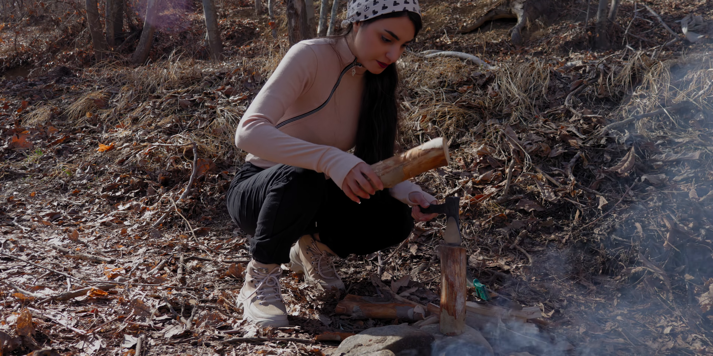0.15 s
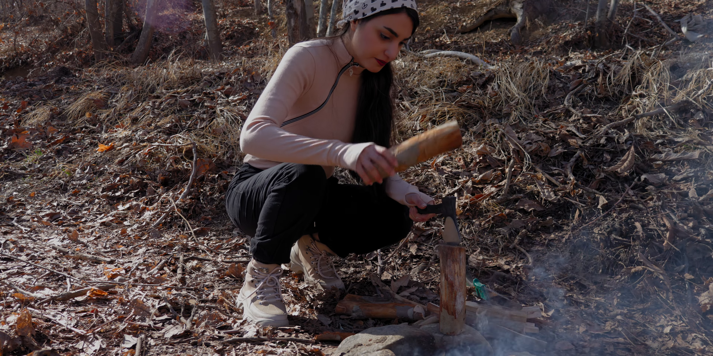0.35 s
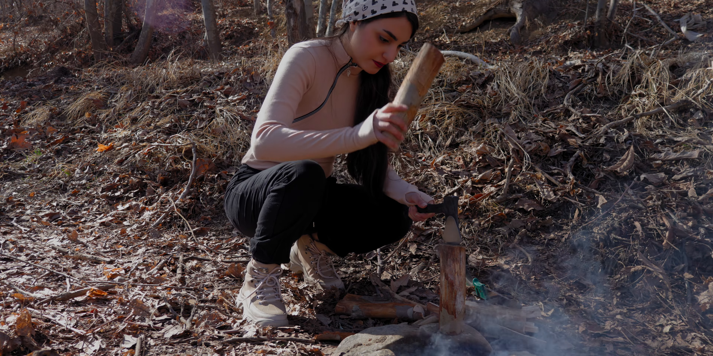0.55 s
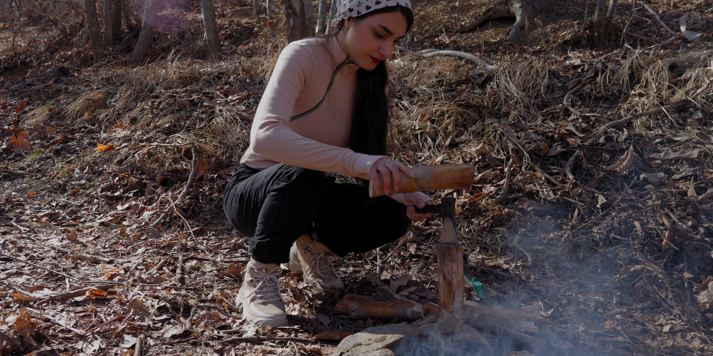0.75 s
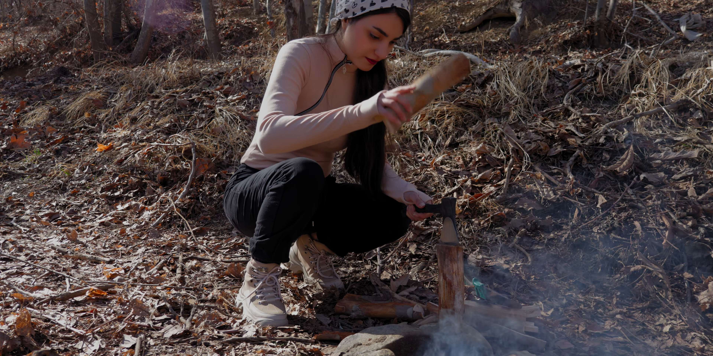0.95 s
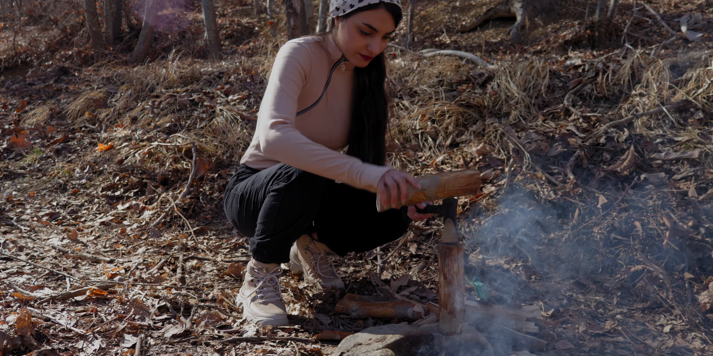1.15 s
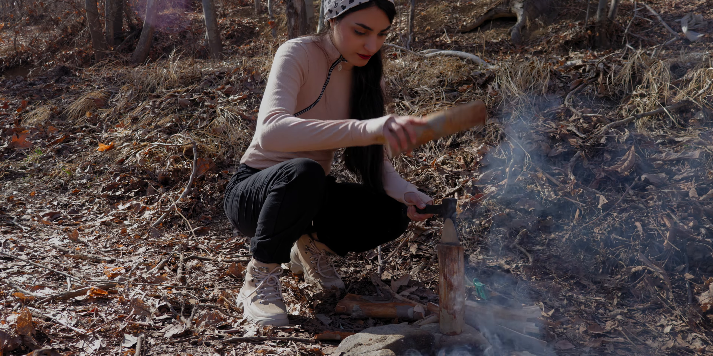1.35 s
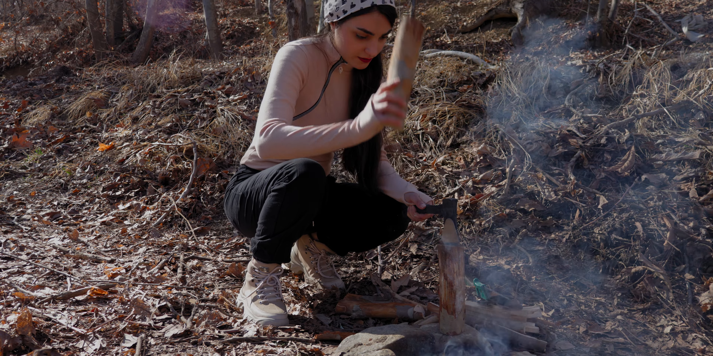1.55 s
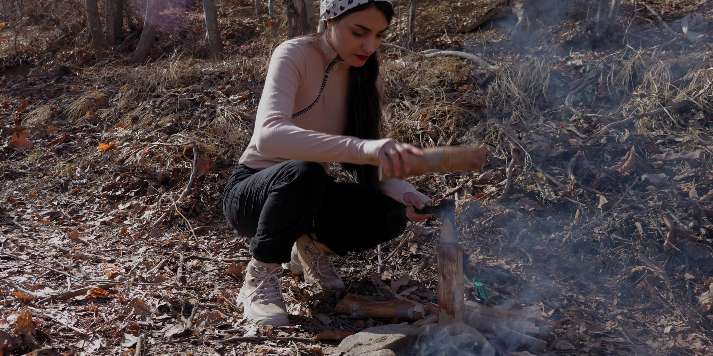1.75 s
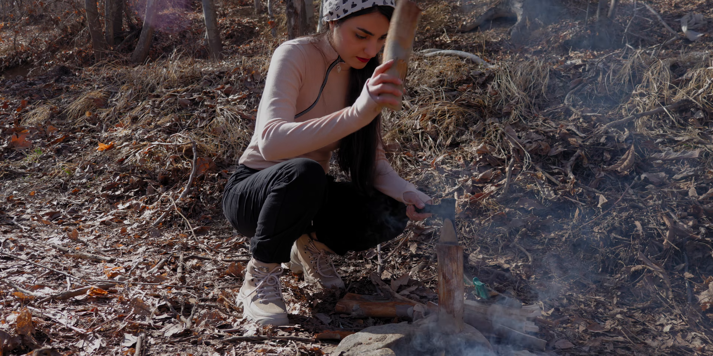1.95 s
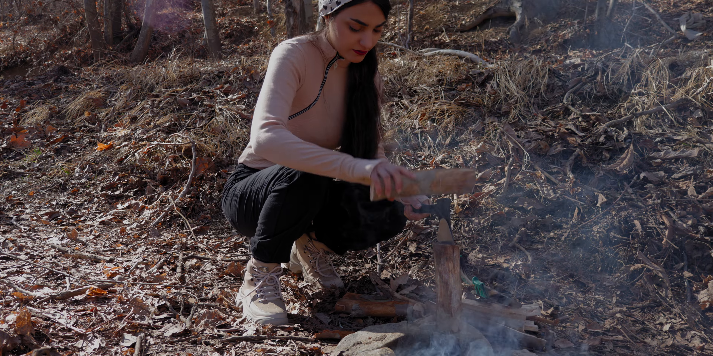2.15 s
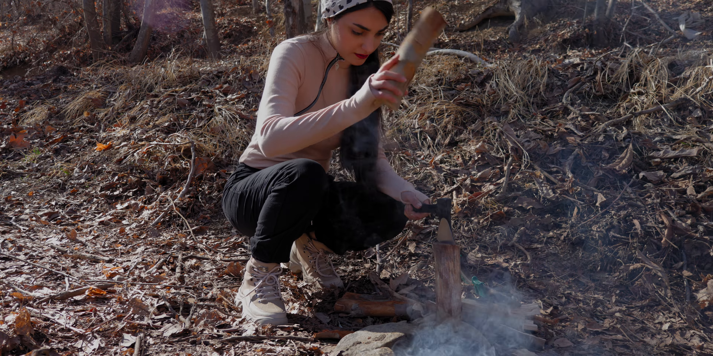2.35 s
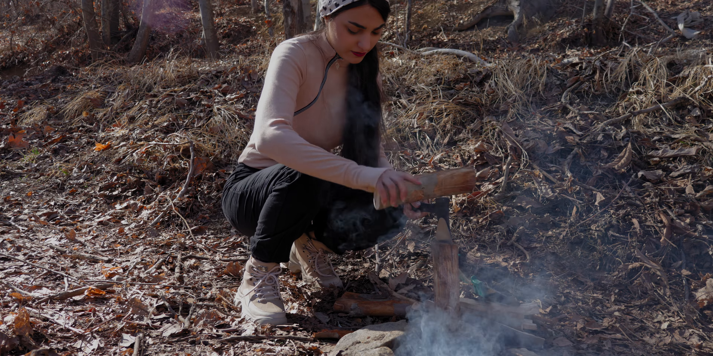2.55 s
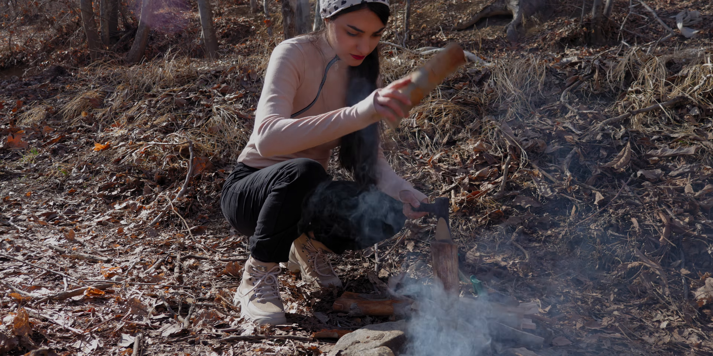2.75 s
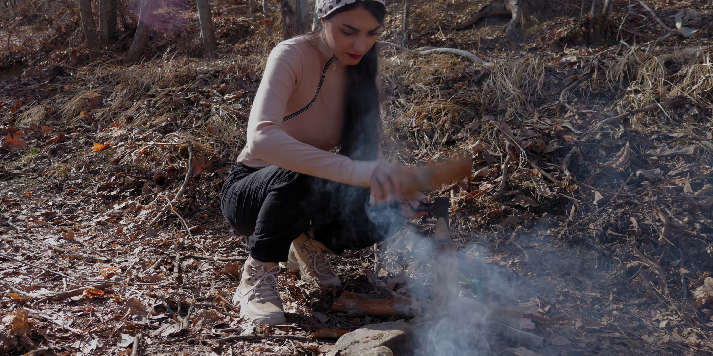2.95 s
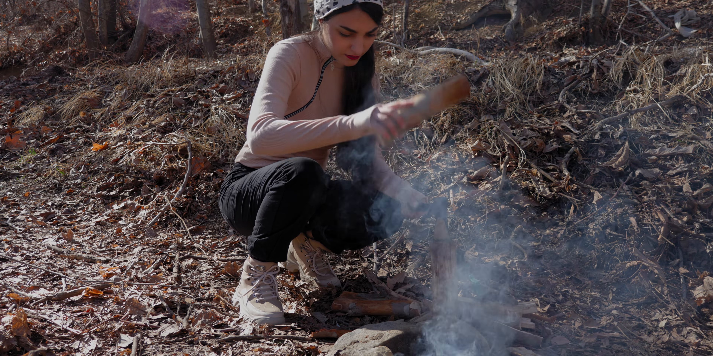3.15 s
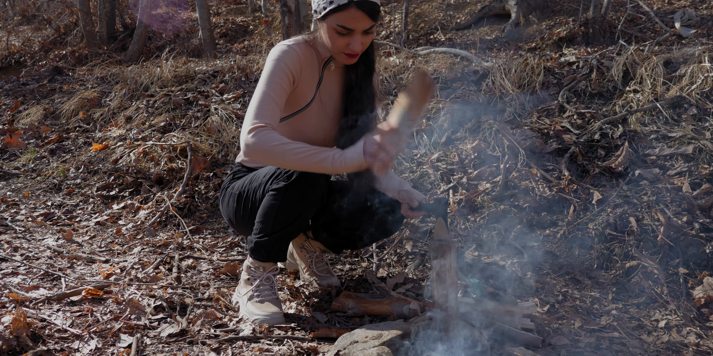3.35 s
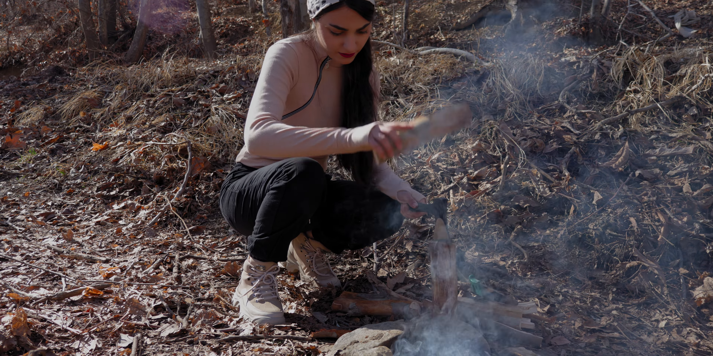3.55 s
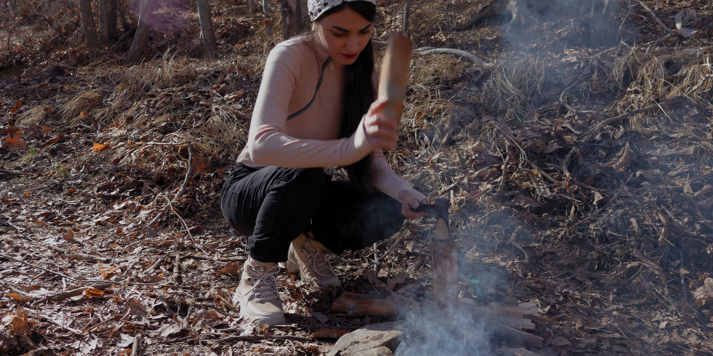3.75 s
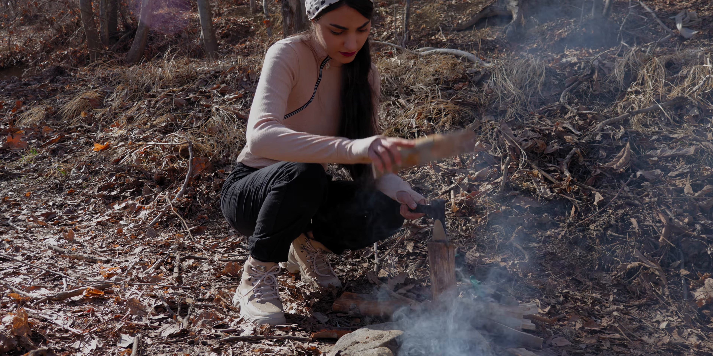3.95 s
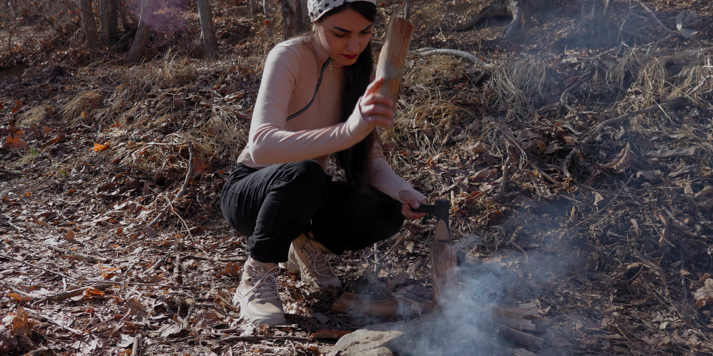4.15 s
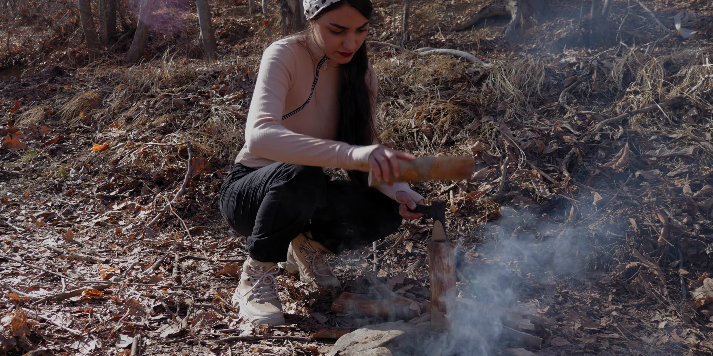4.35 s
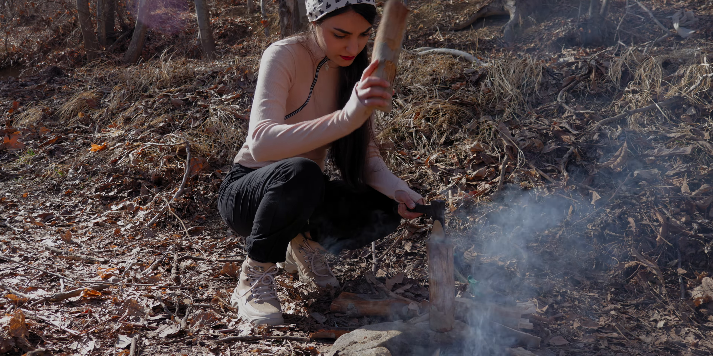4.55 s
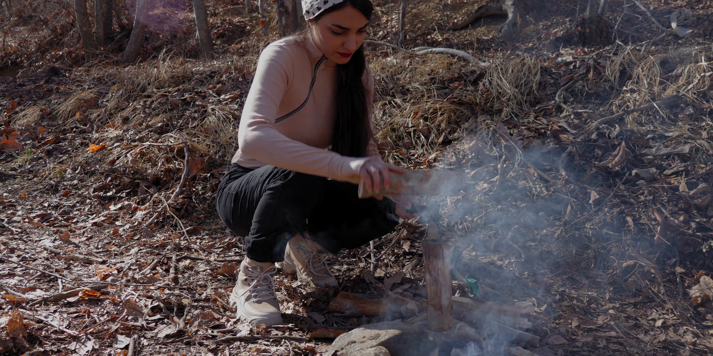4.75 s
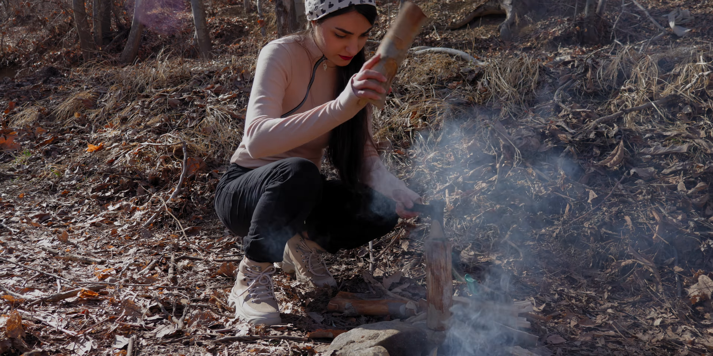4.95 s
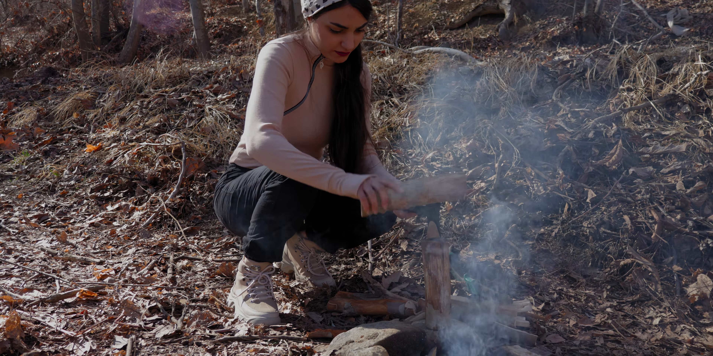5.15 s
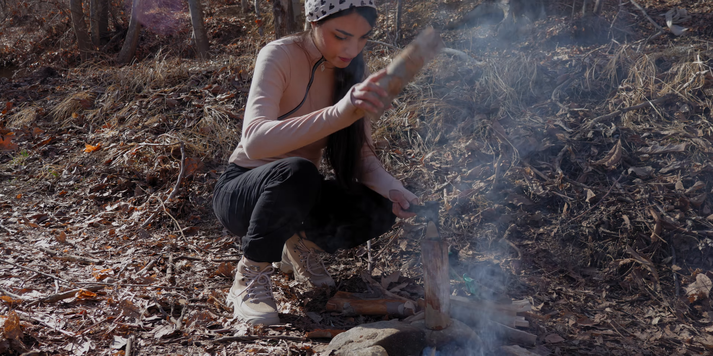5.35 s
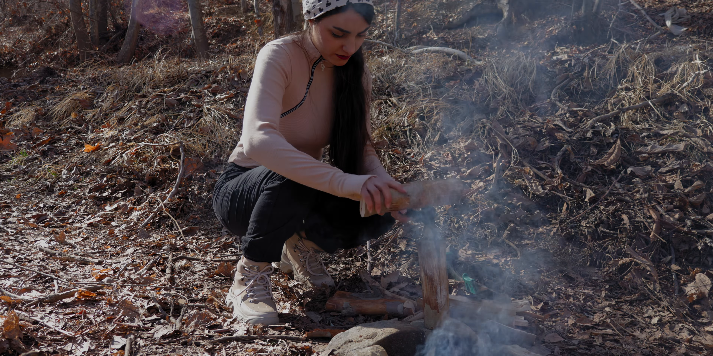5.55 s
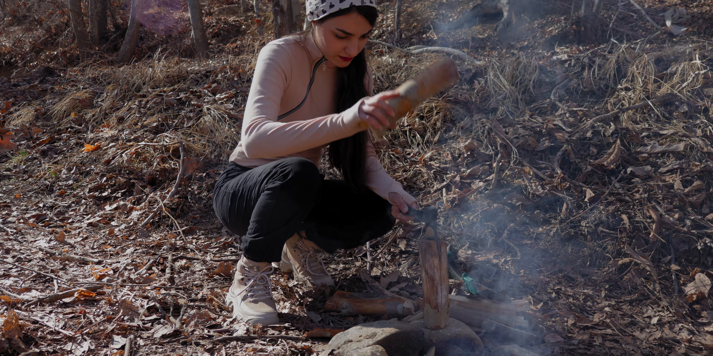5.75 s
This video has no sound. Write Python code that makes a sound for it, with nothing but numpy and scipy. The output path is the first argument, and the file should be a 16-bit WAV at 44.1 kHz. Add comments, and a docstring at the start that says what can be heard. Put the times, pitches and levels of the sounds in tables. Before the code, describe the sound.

Steady, sharp knocks of wood on a hatchet split a log outdoors, over light wind rumble and faint campfire ticks.

```python
"""Splitting a log at a forest camp

Close to the microphone, a wooden club knocks a hatchet into a standing log twelve times.
Log, club and steel ring briefly and overload the input; fibres tear, and the trees throw each knock back.
Behind the work a campfire ticks faintly, light wind rumbles on the microphone,
and something drones far off in the hush of the woods."""
import sys
import numpy as np
from scipy import signal
from scipy.fft import rfft, irfft
from scipy.io import wavfile
from scipy.ndimage import uniform_filter1d

SR = 44100
rng = np.random.default_rng(int(sys.argv[2]) if len(sys.argv) > 2 else 0)


def bounce(signal):
    """Save signal as a 16-bit WAV file at the path given by the first command-line argument."""
    frames = np.transpose(np.atleast_2d(signal))
    limited = np.clip(frames, -1, 1)
    pcm = np.round(limited * 32767).astype(np.int16)
    wavfile.write(sys.argv[1], SR, pcm)


N = 259749
TIME = np.arange(N) / SR
RING_TIME = np.arange(SR // 8) / SR

# One row a blow: start_s, thud_db, log_db, club_db, head_db, blade_db, blade_hz,
# crack_db, splinter_hz, tear_db, log_pitch_ratio, club_pitch_ratio
BLOWS = [(.771, -1, -2.5, -3, -7.5, -0.5, 2900, -0.5, 3400, -22, .98, 0.98),
         (1.2709, 0.5, 2, -8.5, -0.5, -3, 3030, -0.5, 4680, -5, 0.98, 1.085),
         (1.758, 0.5, 0, 2, 2.5, -1, 3000, -5.5, 4340, -1, 1.04, 1),
         (2.2024, 2.5, 1, 2.5, 3, 3.5, 3080, 3, 4150, 1.5, 1.037, 0.98),
         (2.6444, 3, 3, -2.5, -7.5, -12, 3125, 3, 4160, -1.5, 1.073, 1.04),
         (3.0859, -5, 2, 1.5, -8, -.5, 3190, 0, 4000, 0.5, 1.02, 0.93),
         (3.5168, -2.5, 3, 3, -3, 2, 3080, 2, 3550, -2, 1.05, 0.95),
         (3.946, -10, 3, 1.5, -0.5, -15, 2770, 5.5, 3330, 1.5, 0.92, 1),
         (4.3735, 3, 2.5, -1, 3, 6.5, 3076, 4.5, 3200, -1, 1.051, 1.014),
         (4.7966, -2, 3, -1, 2, -9, 2900, 4, 3010, 1, 0.98, 0.96),
         (5.234, -5, 2, -6, -3.5, -.5, 3040, 7.5, 6200, -3.5, 0.98, 0.94),
         (5.6609, -10.5, -1, -6.5, -1, -13, 2710, 3.5, 4400, 6, 1.01, 1.06)]
# Modes of the struck parts: pitch_hz, relative_db, t60_s
LOG_THUD_MODES = [(358, -3.5, 0.035), (518.5, 4, 0.018)]
LOG_KNOCK_MODES = [(737.5, 18, 0.0093), (909.6, 10.5, 0.017), (1128, 20.5, 0.0055)]
CLUB_MODES = [(1438.6, 14.5, 0.014), (1593.4, 10.1, 0.018), (1829, 8.1, 0.018)]
HEAD_MODES = [(2350.4, 3.5, 0.03), (2884, -15.5, 0.041), (4320, -7.5, 0.01)]  # steel, damped by the grip of the wood
LANDING_MODES = [(294, -10, 0.023), (437, 4, 0.016), (690, -1, 0.014), (1100, -3.5, 0.016),
                 (1600, -9.5, 0.014)]  # the log meeting the ground
# The log drops back after some blows: start_s, gain_db
LANDINGS = [(2.222, -26), (2.687, -25), (3.993, -10), (5.6789, -3.5)]
# Echoes from near trunks: delay_s, gain_db, centre_hz
TRUNK_ECHOES = [(0.049, -45, 2820), (0.057, -57, 930), (0.0698, -42.5, 1320), (0.0699, -36.5, 4000)]
# Decay of the far trees' echo: frequency_hz, t60_s
FOREST_DECAY = [(200, 0.94), (1200, 1.0), (2500, 0.83), (4000, 0.53), (8000, 0.39), (16000, 0.33)]
# Campfire ticks: start_s, level_db
FIRE_TICKS = [(.385, -50), (0.636, -45), (2.412, -49), (2.704, -45), (2.761, -33.5), (2.889, -49),
              (5.207, -37)]
# Rumble at the microphone, a light breeze and then one gust: time_s, level_db
WIND_LEVELS = [(0, -36.5), (.55, -32.5), (1.15, -37.5), (1.98, -33), (2.4, -37), (4.3, -37), (4.95, -33),
               (5.14, -22.5), (5.42, -30.5), (5.89, -26.5)]
# Spectral shapes of the noises and the echo tail: frequency_hz, relative_db
CRACK_SPECTRUM = [(300, -16.5), (1000, 12.5), (3000, -2.5), (4500, -7), (7000, -12), (11000, -13),
                  (16000, -27)]
FIBRE_SPECTRUM = [(300, 4), (1500, 2.5), (3500, -27.5), (7000, -16), (16000, -24)]
FOREST_SPECTRUM = [(150, -10), (400, -6), (750, -14), (1100, -4), (1600, -7.5), (2400, 1), (3500, 5),
                   (6000, 3.5), (15000, 13)]
TICK_SPECTRUM = [(300, -15), (2000, -15), (5000, 1), (9000, 12), (16000, -1)]
WIND_SPECTRUM = [(8, -3), (25, 6), (45, -1.5), (70, -5.5), (120, -17), (170, -20), (250, -26.5), (400, -35),
                 (700, -45), (3000, -104)]
HUSH_SPECTRUM = [(20, -43), (250, -23), (500, 3), (900, 1), (1500, -4), (2500, -6.5), (4000, -12.5),
                 (5500, -13.5), (8000, -16), (15500, -21)]


def chopping():
    """The work close to the microphone: twelve blows, with the log settling after some."""
    out = np.zeros(N)
    for start_s, *controls in BLOWS:
        add(out, start_s, blow(*controls))
    for start_s, gain_db in LANDINGS:
        add(out, start_s, forest_echo(log_landing(gain_db)))
    return out


def blow(thud_db, log_db, club_db, head_db, blade_db, blade_hz,
         crack_db, splinter_hz, tear_db, log_pitch_ratio, club_pitch_ratio):
    """Contact pushes the air; wood and steel ring while the split runs on, and the trees answer."""
    contact_s, steel_lag_s, ground_lag_s, blade_t60_s = 0.00027, 0.000881, 0.00409, 0.017
    push = amp(3.5) * np.sin(np.pi * np.minimum(RING_TIME / contact_s, 1))
    # from blow to blow the log's pitch shifts as the split opens, the club's with the grip
    thud = amp(thud_db) * ring(LOG_THUD_MODES, contact_s, log_pitch_ratio)
    knock = amp(log_db) * ring(LOG_KNOCK_MODES, contact_s, log_pitch_ratio)
    club = amp(club_db) * ring(CLUB_MODES, contact_s, club_pitch_ratio)
    wood = thud + knock + club
    wood = wood + 0.13 * delayed(wood, ground_lag_s)  # reflection off the leafy ground
    head = amp(head_db) * ring(HEAD_MODES, steel_lag_s)
    # the thin blade has one short note, set by how the wood grips it
    blade = ring([(blade_hz, blade_db, blade_t60_s)], steel_lag_s)
    split = splitting_wood(crack_db, tear_db)
    splinter = amp(6.5) * resonate(split, splinter_hz, q=5)  # the breaking strand rings
    direct = push - wood + head + blade + split + splinter  # struck wood first moves away from the air
    # the flat cheeks of the head and the open split beam their ring sideways into the trees
    return forest_echo(direct, sideways=amp(-5.5) * head + amp(-10) * splinter)


def splitting_wood(crack_db, tear_db, crack_t60_s=0.023, tear_t60_s=0.053):
    """A sharp crack, then fibres tear in dense clumps as the blade wedges deeper."""
    size = len(RING_TIME)
    crack = amp(crack_db - 60 * RING_TIME / crack_t60_s) * noise(CRACK_SPECTRUM, size)
    clumps = unit(uniform_filter1d(rng.exponential(1, size) ** 2, size=32))
    tear_envelope = amp(tear_db - 9.5 - 60 * RING_TIME / tear_t60_s)
    return crack + tear_envelope * clumps * noise(FIBRE_SPECTRUM, size)


def log_landing(gain_db, rise_s=0.0011):
    """The log lands on the ground with a soft-edged thump."""
    return -amp(gain_db) * ring(LANDING_MODES) * (1 - np.exp(-RING_TIME / rise_s))


def forest_echo(direct, sideways=0, scatter_db=-33, build_s=0.031, bark_s=0.002):
    """A sound with its echoes: near trunks answer clearly, the many far ones blur into a dying tail."""
    t = np.arange(SR) / SR
    scatter = rng.standard_normal(SR) * (1 - np.exp(-(t / build_s) ** 2))
    hz, age_s, bands = signal.stft(scatter, SR, nperseg=256)
    decay_db = 60 * age_s / curve_at(FOREST_DECAY, hz)[:, None]
    bands = bands * amp(curve_at(FOREST_SPECTRUM, hz)[:, None] - decay_db)
    tail = signal.istft(bands, SR, nperseg=256)[1]
    out = amp(scatter_db) * signal.fftconvolve(direct + sideways, tail / np.linalg.norm(tail))
    add(out, 0, direct)
    for delay_s, gain_db, centre_hz in TRUNK_ECHOES:
        # a rough round trunk smears its echo
        smear = rng.standard_normal(len(RING_TIME)) * np.exp(-RING_TIME / bark_s)
        echo = signal.fftconvolve(direct, smear / np.linalg.norm(smear))
        add(out, delay_s, amp(gain_db) * resonate(echo, centre_hz, q=2.5))
    return out


def campfire(t60_s=0.012):
    """Tiny dry pops of burning wood, faint behind the chopping."""
    out = np.zeros(N)
    for start_s, level_db in FIRE_TICKS:
        envelope = amp(level_db - 60 * RING_TIME / t60_s)
        add(out, start_s, envelope * noise(TICK_SPECTRUM, len(RING_TIME)))
    return out


def microphone_wind(crossover_hz=87, buffet_db=-10.5):
    """Eddies right on the microphone: a deep rumble and lighter buffeting rise and fall together."""
    eddies = noise(WIND_SPECTRUM, N)
    rumble = signal.sosfiltfilt(signal.butter(3, crossover_hz, fs=SR, output="sos"), eddies)
    buffeting = amp(buffet_db) * unit(eddies - rumble)
    strength = amp(np.interp(TIME, *np.transpose(WIND_LEVELS)))
    return strength * (unit(rumble) + buffeting)


def distant_drone(pitch_hz=140, waver=0.016, peak_db=-43.5, peak_s=4.97, fade_db_per_s=4.5):
    """Far off, a faint wavering tone swells to one peak and recedes."""
    drift = noise([(1, 1.5), (6, -7.5), (30, -59.5), (200, -120)], N)
    tone = np.sin(2 * np.pi * np.cumsum(pitch_hz * (1 + waver * drift)) / SR)
    return amp(peak_db - fade_db_per_s * abs(TIME - peak_s)) * tone


def forest_hush(level_db=-51):
    """The even hush of the woods all around."""
    return amp(level_db) * noise(HUSH_SPECTRUM, N)


def ring(modes, delay_s=0, pitch_ratio=1):
    """Damped modes set swinging from rest after a delay."""
    t = np.maximum(RING_TIME - delay_s, 0)
    return sum(amp(db - 60 * t / t60_s) * np.sin(2 * np.pi * hz * pitch_ratio * t)
               for hz, db, t60_s in modes)


def resonate(x, centre_hz, q):
    """A sound through one resonant band."""
    return signal.lfilter(*signal.iirpeak(centre_hz, q, SR), x)


def noise(spectrum, size):
    """Noise of rms 1 with the given spectral shape."""
    gains = amp(curve_at(spectrum, np.fft.rfftfreq(size, 1 / SR)))
    return unit(irfft(rfft(rng.standard_normal(size)) * gains, size))


def curve_at(points, hz):
    """Interpolates a table on a log-frequency axis."""
    points_hz, values = np.transpose(points)
    return np.interp(np.log(hz + 1), np.log(points_hz + 1), values)


def amp(db):
    """Decibels to gain."""
    return 10 ** (np.asarray(db) / 20)


def unit(x):
    """Scales to rms 1."""
    return x / np.sqrt(np.mean(x ** 2) + 1e-20)


def delayed(x, delay_s):
    """The same sound, later."""
    return np.concatenate([np.zeros(round(delay_s * SR)), x])[:len(x)]


def add(mix, start_s, sound):
    """Mixes a sound in at its start time."""
    part = mix[round(start_s * SR):][:len(sound)]
    part += sound[:len(part)]


def scene():
    """The camp as it reaches one microphone beside the log."""
    return (chopping() + campfire() + microphone_wind() + distant_drone() + forest_hush())[None]


def record(dry, cutoff_hz=16000):
    """Each knock drives the recorder into hard clipping; a low-pass then takes off the highest treble."""
    clipped = np.clip(dry, -1, 1)
    lowpass = signal.firwin(401, cutoff_hz, window=("kaiser", 8), fs=SR)
    return signal.oaconvolve(clipped, lowpass[None], "same")


dry = scene()
out = record(dry)
bounce(out)
```